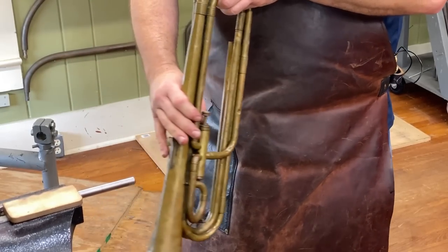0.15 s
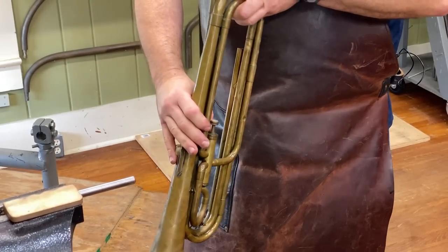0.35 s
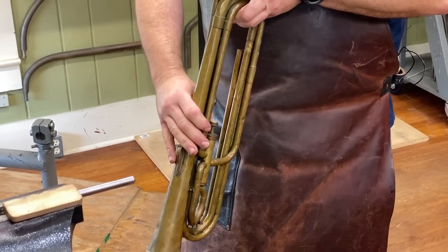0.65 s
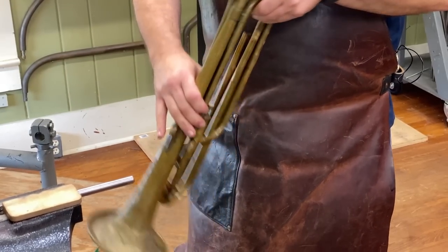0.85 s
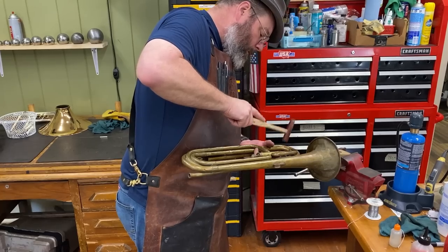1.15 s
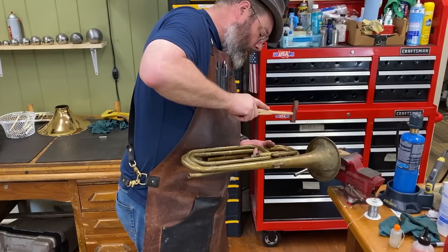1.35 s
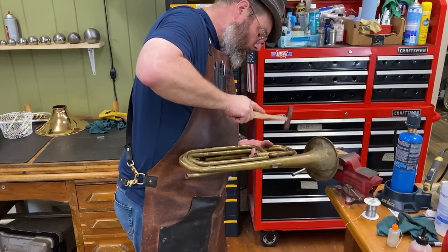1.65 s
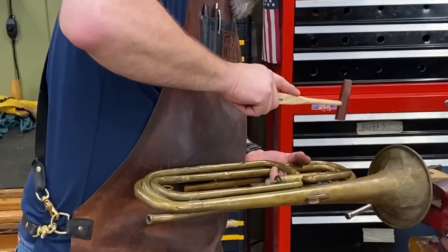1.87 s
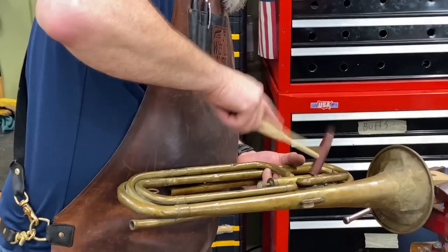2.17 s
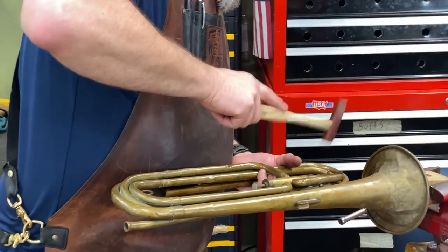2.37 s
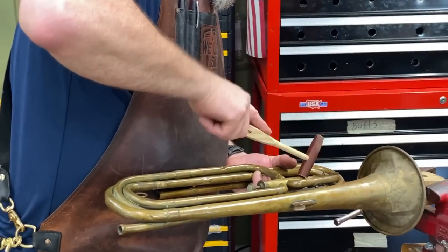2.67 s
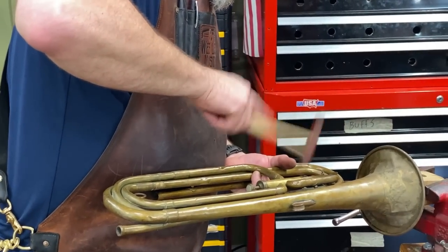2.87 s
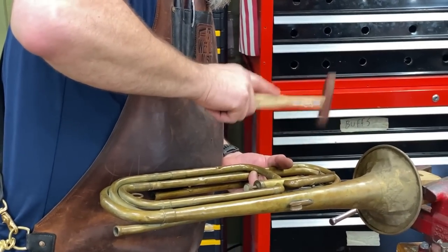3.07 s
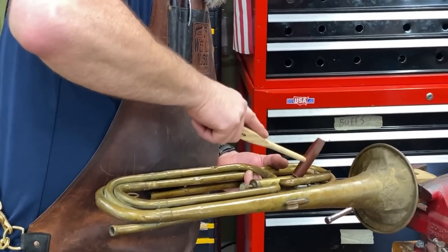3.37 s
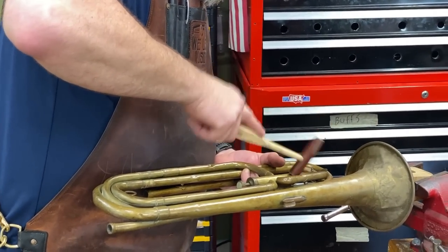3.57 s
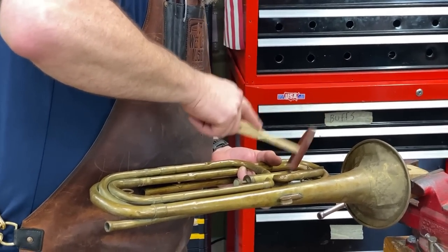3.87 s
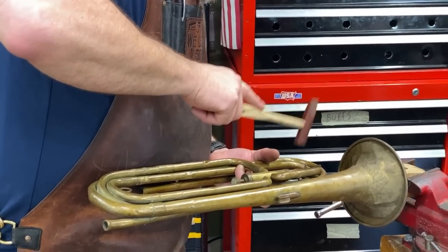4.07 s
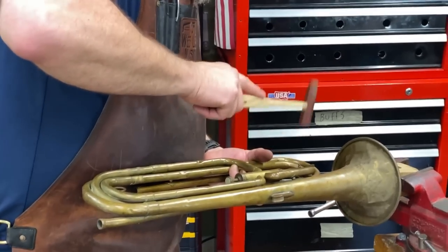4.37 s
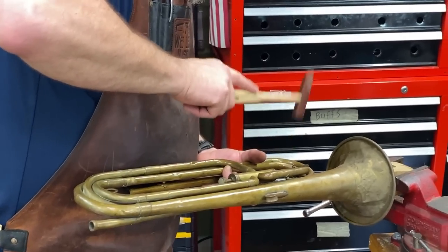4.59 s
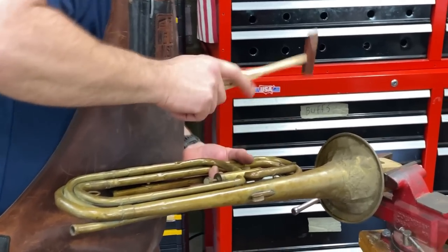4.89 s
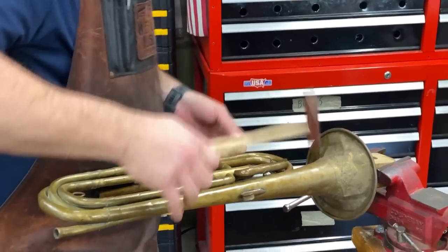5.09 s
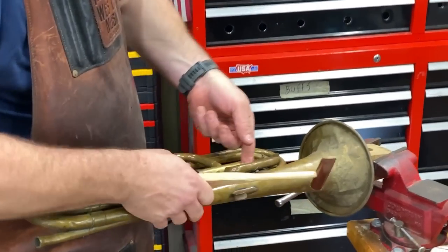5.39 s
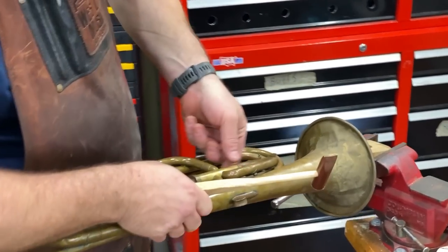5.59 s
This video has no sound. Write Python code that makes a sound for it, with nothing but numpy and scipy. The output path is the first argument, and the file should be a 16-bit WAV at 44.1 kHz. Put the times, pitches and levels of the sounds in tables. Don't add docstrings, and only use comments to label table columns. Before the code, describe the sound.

A small mallet raps a brass horn about four times a second in a workshop, sharp metallic clanks over body-worn microphone rumble and cloth rustle.

```python
import sys
import numpy as np
from scipy import signal
from scipy.fft import rfft, irfft
from scipy.io import wavfile
from scipy.ndimage import uniform_filter1d

SR = 44100
rng = np.random.default_rng(int(sys.argv[2]) if len(sys.argv) > 2 else 0)


def generate_wav(signal):
    frames = np.transpose(np.atleast_2d(signal))
    scaled = np.clip(frames, -1, 1) * 32767
    pcm = np.round(scaled).astype(np.int16)
    wavfile.write(sys.argv[1], SR, pcm)


def amplitude_ratio(level_db):
    exponent = np.asarray(level_db, float) / 20
    return 10 ** exponent


N = 253134

# start in seconds, crack level in dB, knock of the tubes in dB, weight of the arm in dB.
BLOWS = [(1.053, -30.5, -23, -52), (1.275, -10.5, -9, -7.5), (1.536, -6.5, -3.5, -4), (1.787, -7.5, -2, -3),
         (2.023, -6.5, -8.5, -6.5), (2.264, -7.5, -3.5, -5), (2.502, -10, -4.5, -1),
         (2.745, -6.5, -7, -1.2), (2.973, -7, -6, 1), (3.206, -7.5, 1, 1), (3.423, -8.5, 2, 1.1),
         (3.657, -8, 0.5, -0.5), (3.888, -8.5, 0.6, 1.5), (4.324, -11, -1, -0.2), (4.537, -8.5, -1, 3),
         (4.766, -8, -2, 2.1)]


def evened(x):
    return x / np.sqrt(np.mean(x ** 2) + 1e-20)


def head(x, s):
    return x / np.sqrt(np.mean(x[:round(s * SR)] ** 2))


def read(points, hz):
    f, value = np.transpose(points)
    return np.interp(np.log(hz + 1), np.log(f + 1), value)


def add(mix, s, sound):
    part = mix[max(round(s * SR), 0):][:len(sound)]
    part += sound[:len(part)]


def coloured(x, points):
    hz = np.fft.rfftfreq(len(x), 1 / SR)
    return irfft(rfft(x) * amplitude_ratio(read(points, hz)), len(x))


def dying(x, t60s):
    hz, t = np.fft.rfftfreq(len(x), 1 / SR), np.arange(len(x)) / SR
    marks, out = np.log(np.transpose(t60s)[0]), 0
    for k, (_, t60) in enumerate(t60s):
        share = np.interp(np.log(hz + 1), marks, np.arange(len(marks)) == k)
        band = irfft(rfft(x) * share, len(x))
        out = out + band * amplitude_ratio(-60 * t / t60)
    return out


def rings(modes, chance, spread_db, detune, flip):
    t, count = np.arange(SR // 2) / SR, len(modes)
    hz, width, db = np.transpose(modes)[:, :, None]
    level = amplitude_ratio(db + spread_db * chance[0, :count, None]) * width
    phase = 2 * np.pi * hz * (1 + detune * chance[1, :count, None]) * t
    sign = flip ** np.arange(count)[:, None]
    return (sign * level * np.exp(-np.pi * width * t) * np.sin(phase)).sum(0)


def stirring():
    # time in seconds, level in dB over rest.
    stir = [(0, 6.5), (.3, 2.3), (.7, 3), (1.052, 7.5), (2.2, 6), (3.5, 6.5), (4.15, 10), (4.45, 10.5),
            (4.8, 3.5), (5.02, 11), (5.18, 9.5), (5.24, 27), (5.4, 10), (5.74, 13.5)]
    rumble_db, rumble_per_stir, hum_db, hum_per_stir = -50.5, 1.65, -50, 0.6
    shake_db, shake_s = -48.5, 0.023
    stir_db = np.interp(np.arange(N) / SR, *np.transpose(stir))
    hum = amplitude_ratio(hum_db + hum_per_stir * stir_db)
    u = np.arange(SR // 2) / SR / shake_s
    for s, _, _, weight_db in BLOWS:
        add(hum, s, amplitude_ratio(shake_db + weight_db) * u * np.exp(1 - u))
    return amplitude_ratio(rumble_db + rumble_per_stir * stir_db), hum


def rubs():
    # start in seconds, length in seconds, rustle in dB, fade in dB, hiss against rustle in dB.
    strokes = [
        (0, 0.11, -64.5, -6, 6),
        (.815, 0.15, -78.5, -6, 13),
        (0.957, 0.31, -52.5, 1, -22),
        (4.954, 0.078, -48, 3, -22),
        (5.034, 0.216, -37, -15, -15),
        (5.252, 0.262, -51.5, -7, -6.5),
        (5.5, 0.29, -47, -13, -17),
    ]
    edge_s, still_rustle_db, still_hiss_db = 0.0054, -59, -67
    rustle, hiss = np.full(N, amplitude_ratio(still_rustle_db)), np.full(N, amplitude_ratio(still_hiss_db))
    for s, length, db, fade_db, hiss_db in strokes:
        t = np.arange(0, length, 1 / SR)
        edges = np.clip(np.minimum(t, length - t) / edge_s, 0, 1)
        stroke = amplitude_ratio(db + fade_db * t / length) * edges
        add(rustle, s, stroke)
        add(hiss, s, amplitude_ratio(hiss_db) * stroke)
    return rustle, hiss


def background():
    # frequency in Hz, density in dB per Hz.
    rumble_colour = [(3, -37.5), (7, 21.5), (14, 32.5), (24, 14), (36, -63.5)]
    hum_colour = [(15, -22.5), (25, 4.5), (59, 6.5), (102, -5.5), (135, -6.5), (157, -14), (220, -16.5),
                  (290, -78.5), (480, -120)]
    early_cloth_colour = [(88, -30), (150, -5), (198, -3), (478, -6), (594, -12.5), (1600, -14.5), (2080, -46),
                          (3520, -120)]
    late_cloth_colour = [(88, -35.5), (150, -1.5), (352, -3.5), (538, 1.5), (631, -11), (784, -3), (1130, -10),
                         (1600, -12), (2080, -43), (3520, -120)]
    hiss_colour = [(710, -33), (1200, -11), (1680, 0), (1870, 0), (4680, -13), (5320, -16), (6370, -19),
                   (9080, -16.5), (10500, -24.5), (13600, -55), (22000, -120)]
    (rumble, hum), (rustle, hiss) = stirring(), rubs()
    late_cloth = np.clip((np.arange(N) / SR - 0.98) / 0.0043, 0, 1)
    layers = [(rumble_colour, rumble, 0.3),
              (hum_colour, hum, 1.5),
              (early_cloth_colour, rustle * (1 - late_cloth), 1.8),
              (late_cloth_colour, rustle * late_cloth, 2.5),
              (hiss_colour, hiss, 1.2)]
    out = 0
    for colour, level, patchy_db in layers:
        slow = uniform_filter1d(uniform_filter1d(rng.standard_normal(N), 700), 700)
        noise = evened(coloured(rng.standard_normal(N), colour))
        out = out + noise * level * amplitude_ratio(patchy_db * evened(slow))
    return out


def bumps():
    # start in seconds, level in dB, frequency in Hz, T60 in seconds, sign of the push.
    swings = [
        (0.961, -26.5, 6.5, 1, 1),
        (5.022, -12, 7.2, 0.28, -1),
        (5.207, -2.5, 12.93, 0.45, 1),
        (5.559, -25, 14.6, 0.67, -1),
    ]
    out, t = np.zeros(N), np.arange(SR) / SR
    for s, db, hz, t60, sign in swings:
        rise = 1 - np.exp(-t / 0.03)
        add(out, s, sign * amplitude_ratio(db + 4.0 - 60 * t / t60) * rise * np.sin(2 * np.pi * hz * t))
    return out


def shop(x):
    # frequency in Hz, T60 in seconds.
    shop_t60 = [(100, 0.051), (300, 0.51), (700, 0.31), (1800, 0.41), (4800, 0.43), (9000, 0.36),
                (12000, 0.32), (15000, 0.27)]
    # frequency in Hz, level in dB.
    shop_colour = [(200, -14), (750, 1), (1200, -4.5), (1750, 2.4), (2200, -2), (2900, 1.5), (4000, -5.5),
                   (4900, -2), (6000, -6.5), (8000, -6.5), (9300, -3), (10300, -5.5), (11000, -13.5),
                   (15500, -15.5)]
    out, t = np.zeros(N), np.arange(N) / SR
    for k in range(3):
        taps = np.zeros(SR)
        at = np.arange(300, SR - 20, 20)
        taps[at + rng.integers(0, 20, len(at))] = rng.choice([-1., 1.], len(at))
        tail = dying(coloured(taps, shop_colour), shop_t60)
        tail[:300] = 0
        turn = np.sqrt(2 / 3) * np.cos(np.pi * (t / 1.361 + k / 3))
        out += signal.fftconvolve(x * turn, tail / np.linalg.norm(tail))[:N]
    return out


def echoes(x):
    # delay in seconds, level in dB.
    bounces = [
        (0.0105, -8),
        (0.0272, -9.5),
        (.0355, -20),
        (0.054, -22.5),
    ]
    out = np.zeros(N)
    for s, db in bounces:
        add(out, s, amplitude_ratio(db - 8) * x)
    return signal.sosfilt(signal.butter(2, 6500, fs=SR, output="sos"), out)


def ticks():
    # start in seconds, peak in dB.
    creaks = [(0.1065, -50), (0.2194, -54), (0.3323, -51), (0.44, -52), (0.7744, -63), (0.8444, -48),
              (0.9544, -45), (0.987, -46), (5.094, -52), (5.149, -48), (5.1567, -36), (5.18, -48),
              (5.232, -45), (5.256, -39), (5.32, -54), (5.359, -63), (5.509, -50.5)]
    out, t = np.zeros(N), np.arange(SR // 40) / SR
    thin = signal.butter(3, [1800, 9500], "bandpass", fs=SR, output="sos")
    for s, db in creaks:
        noise = signal.sosfilt(thin, rng.standard_normal(len(t)))
        add(out, s, amplitude_ratio(db + 4.5 - 60 * t / 0.0027) * noise)
    return out


def knocks():
    # start in seconds, peak in dB, pitch in Hz, scuff share from 0 to 1.
    contacts = [(0.135, -47, 483, 0.05), (0.455, -49, 400, 0.9), (0.825, -36, 422, 0.57),
                (0.838, -34.5, 560, 0.63), (4.052, -33.5, 485, 0.56), (4.176, -44, 520, 0.2),
                (4.461, -20, 961, 0.56), (4.631, -18.5, 875, 0.66), (4.969, -30, 825, 0.5),
                (5.053, -28, 388, 0.57), (5.069, -27, 268, 0.42), (5.149, -33, 810, 0.5),
                (5.177, -32, 281, 0.87), (5.212, -31, 600, 0.88), (5.234, -49, 250, 0.7),
                (5.319, -29, 246, 0.3), (5.56, -32.5, 396, 0.4), (5.627, -27, 944, 0.57),
                (5.65, -31.5, 346, 0.24), (5.692, -36.5, 547, 0.3)]
    # start in seconds, level in dB.
    shoves = [
        (4.175, -48),
        (4.462, -34),
        (5.053, -30),
        (5.071, -19),
        (5.233, -30),
        (5.318, -47.5),
        (5.626, -55),
        (5.651, -33),
        (5.692, -46),
    ]
    typical_hz, typical_t60_s, rise_s = 450, 0.04, 0.00052
    out, pushes, t = np.zeros(N), np.zeros(N), np.arange(SR // 5) / SR
    dull = signal.butter(2, [220, 1500], "bandpass", fs=SR, output="sos")
    for s, db, hz, scuff in contacts:
        t60 = typical_t60_s * (typical_hz / hz) ** 0.242
        puff = 1.15 * signal.sosfilt(dull, rng.standard_normal(len(t)))
        rise = 1 - np.exp(-t / (rise_s * hz / typical_hz))
        body = amplitude_ratio(db + 5.5 - 60 * t / t60) * rise
        add(out, s, body * ((1 - scuff) * np.sin(2 * np.pi * hz * t) + scuff * puff))
    for s, db in shoves:
        add(pushes, s, amplitude_ratio(db + 21.5) * (t / 0.00065) ** 2 * np.exp(-t / 0.00041))
    return out, pushes


def arm_jolt(weight_db):
    t = np.arange(SR // 2) / SR
    u = t / 0.0075
    thud = np.sin(2 * np.pi * 27 * t) + 0.28 * np.sin(2 * np.pi * 80 * t)
    return amplitude_ratio(-15 + weight_db) * u ** 2 * np.exp(-u) * thud


def tube_knock(s, knock_db, chance):
    # frequency in Hz, width in Hz, level in dB struck mid-horn, level in dB struck nearer the bell.
    tube_modes = [(197.6, 11, -12.5, -10), (300, 34, -10, -4.5), (365.7, 18, -13.5, -5),
                  (455.7, 10, -10, -5), (533, 34, -1.2, -2), (631.7, 79, 4.5, 0.5), (738, 40, 4.5, -2.7),
                  (805, 21, -0.7, -3.5), (903, 72, 1.7, 1.2), (985, 30, -12, -4), (1108, 59, -10.5, -12.5)]
    t, moved_s = np.arange(SR // 2) / SR, 4.1
    tubes = np.array(tube_modes)[:, [0, 1, 2 + (s > moved_s)]]
    knock = rings(tubes, chance, 3.1, 0.0089, 1.)
    scale = amplitude_ratio(knock_db - 7.0) / np.sqrt(np.mean(knock[:SR // 40] ** 2))
    knock = knock * scale
    lowest = rings(tubes[:2], chance, 1.7, 0.006, 1.) * scale
    upper = (knock - lowest) * (1 - np.exp(-t / 0.0008))
    return knock - 0.46 * np.interp(t - 0.0104, t, upper, left=0)


def brass_ring(chance):
    # frequency in Hz, width in Hz, level in dB.
    brass_modes = [(1340, 45, -5), (1598, 22, -4), (1700, 30, -9), (1878, 24, -1), (2035, 25, -9),
                   (2450, 34, 0), (2605, 14, -11), (2770, 14, -9), (2995, 9, 0), (3121, 18, -6),
                   (3570, 45, -6), (4020, 70, -5), (4720, 40, -7), (5003, 20, -11), (5065, 50, -7),
                   (6142, 80, -15), (9020, 140, -14), (9350, 140, -16)]
    return head(rings(brass_modes, chance, 2.2, 0.001, -1.), 0.019) * amplitude_ratio(-8.5)


def wall_crack(common):
    # frequency in Hz, density in dB per Hz.
    crack_colour = [(88, -59), (150, -9.5), (378, -15), (583, -3.5), (1230, -14.5), (1900, -15.5),
                    (2090, -18), (2450, -26.5), (3490, -14), (5070, -18), (10100, -17), (14400, -52),
                    (16500, -74)]
    # frequency in Hz, T60 in seconds.
    crack_t60 = [(200, 0.28), (700, 0.089), (2000, 0.1), (5000, 0.051), (10000, 0.037), (14000, 0.011)]
    noise = coloured(0.47 * common + 0.98 * rng.standard_normal(len(common)), crack_colour)
    crack = head(dying(noise, crack_t60), 0.011) * amplitude_ratio(-1.0)
    lows = signal.sosfilt(signal.butter(2, 1050, fs=SR, output="sos"), crack)
    return crack - 0.97 * lows


def contact(x, crack_db, weight_db):
    hz = np.fft.rfftfreq(len(x), 1 / SR)
    treble = np.clip(np.log2(hz / 3800 + 1e-9) / 1.72, 0, 1.4)
    sheen_db = 1 + 0.56 * weight_db
    return irfft(rfft(x) * amplitude_ratio(crack_db + treble * sheen_db), len(x))


def mallet():
    blows, far, jolts, size = np.zeros(N), np.zeros(N), np.zeros(N), SR // 2
    t, common = np.arange(size) / SR, rng.standard_normal(size)
    fade = np.clip((size / SR - t) * 10, 0, 1) ** 2
    shape = (1 - np.exp(-t / 0.00097)) * fade
    click = amplitude_ratio(17) * np.exp(-((t - 0.0007) / 0.00002) ** 2 / 2)
    for s, crack_db, knock_db, weight_db in BLOWS:
        chance = rng.standard_normal((2, 30))
        crack = contact(wall_crack(common), crack_db, weight_db)
        ring = contact(brass_ring(chance), crack_db, weight_db)
        tick = contact(click, crack_db, weight_db)
        knock = tube_knock(s, knock_db, chance[:, ::-1])
        add(blows, s, shape * (crack + ring + tick + knock))
        add(far, s, shape * (0.32 * crack + 0.52 * ring + 4.83 * tick + 0.21 * knock))
        add(jolts, s, arm_jolt(weight_db))
    thin = signal.butter(3, 190, "highpass", fs=SR, output="sos")
    return signal.sosfilt(thin, blows), signal.sosfilt(thin, far), jolts


def scene():
    blows, far, jolts = mallet()
    small, pushes = knocks()
    far = far + 0.9 * small
    ending = np.clip((N - np.arange(N)) / 500, 0, 1)
    body = (jolts + pushes + bumps() + background()) * ending
    room = echoes(far) + amplitude_ratio(-10.5) * shop(far)
    return (blows + small + room + body + ticks())[None]


def roll_off(x):
    return signal.sosfilt(signal.butter(12, 16820, fs=SR, output="sos"), x)


def record(dry):
    ceiling, knee = 0.7, 5.0
    limited = dry / (1 + abs(dry / ceiling) ** knee) ** (1 / knee)
    edge = signal.firwin(255, 16300, window=("kaiser", 9), fs=SR)
    padded = np.pad(limited, ((0, 0), (127, 127)), "edge")
    smooth = signal.oaconvolve(padded, edge[None], "valid")
    return roll_off(smooth)


dry = scene()
out = record(dry)
generate_wav(out)
```